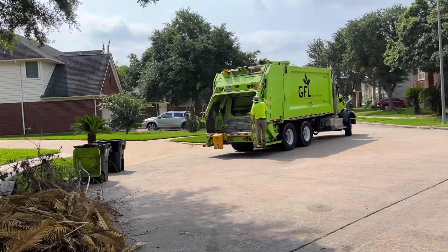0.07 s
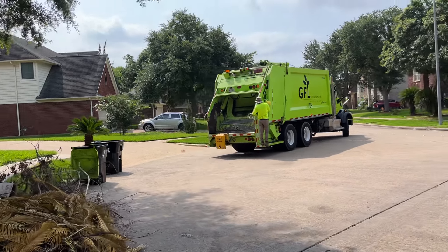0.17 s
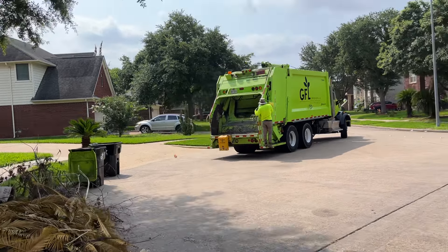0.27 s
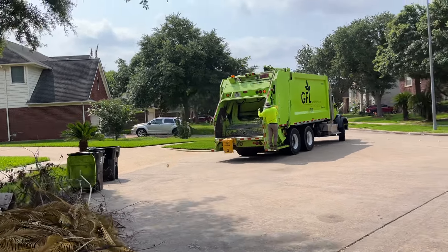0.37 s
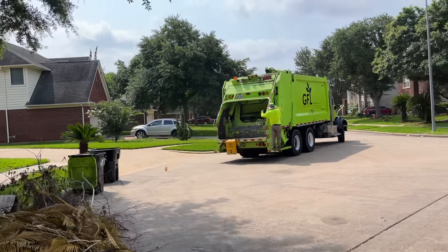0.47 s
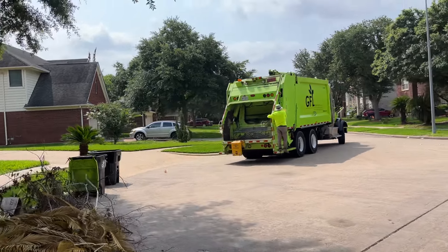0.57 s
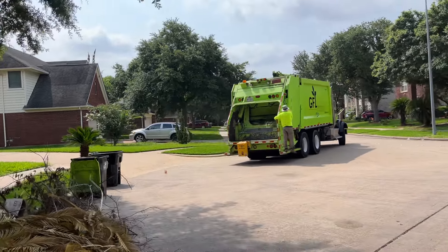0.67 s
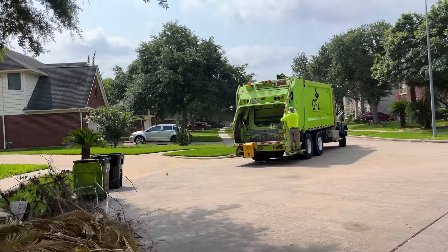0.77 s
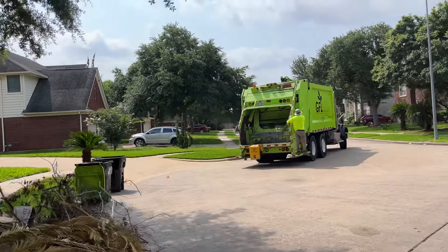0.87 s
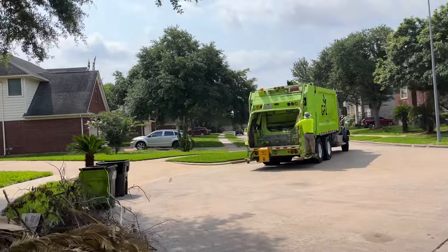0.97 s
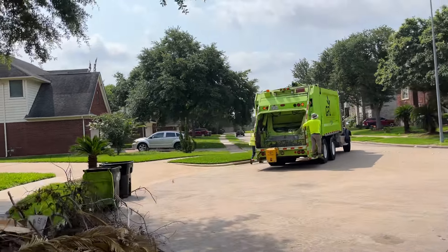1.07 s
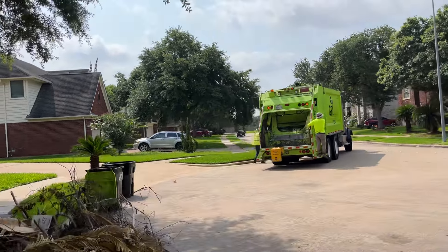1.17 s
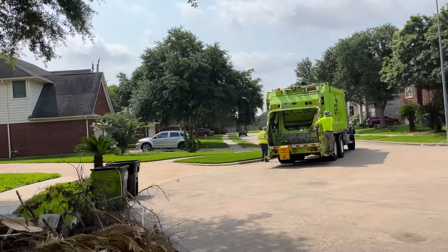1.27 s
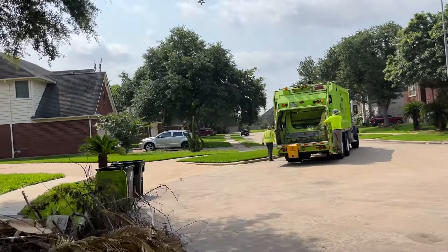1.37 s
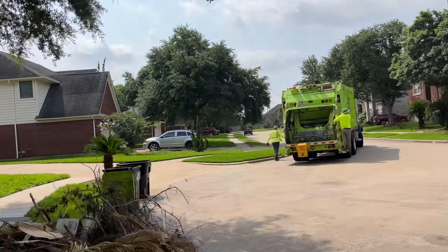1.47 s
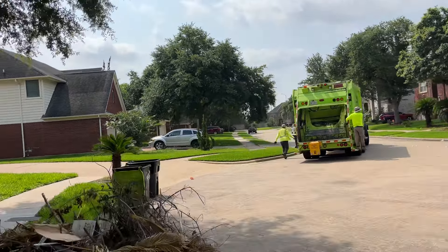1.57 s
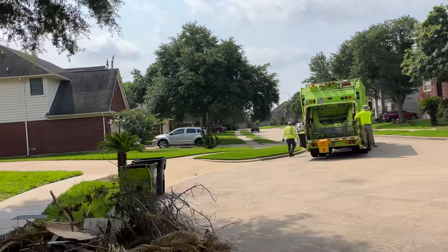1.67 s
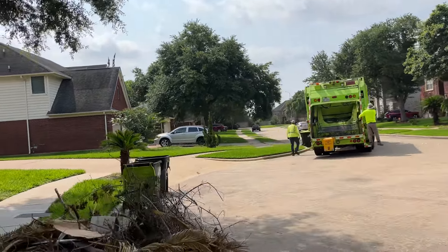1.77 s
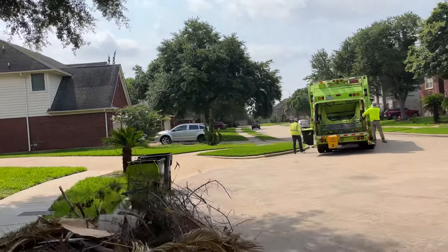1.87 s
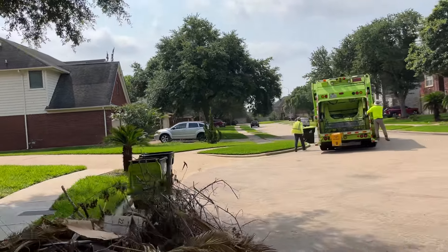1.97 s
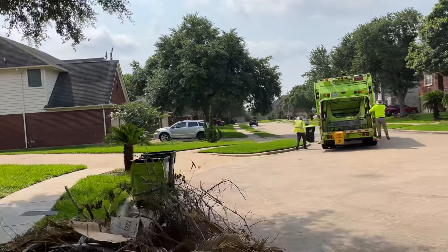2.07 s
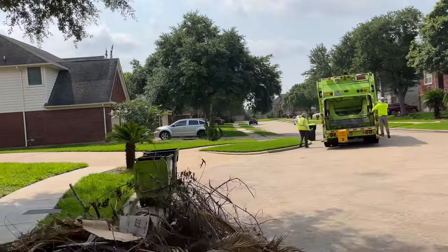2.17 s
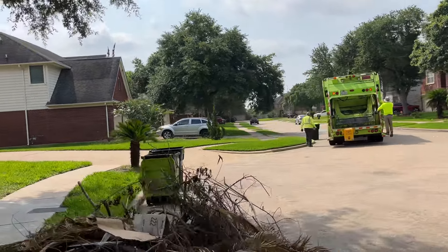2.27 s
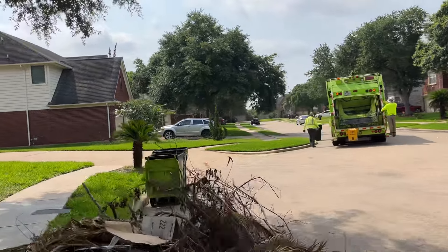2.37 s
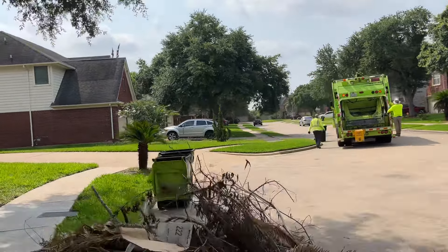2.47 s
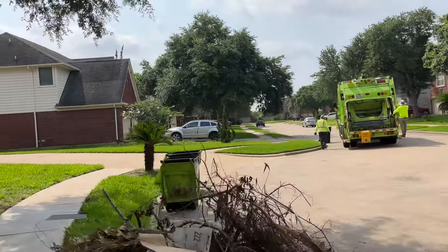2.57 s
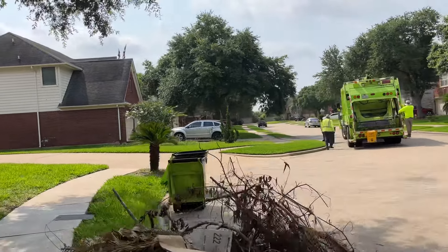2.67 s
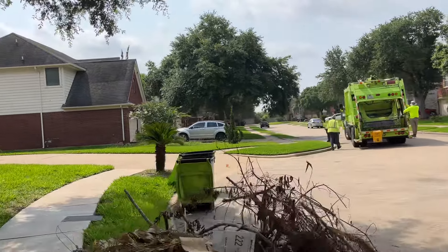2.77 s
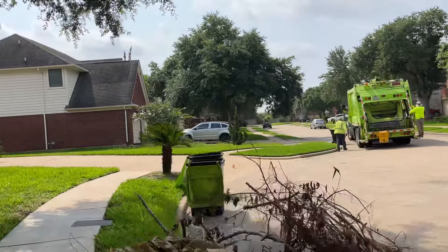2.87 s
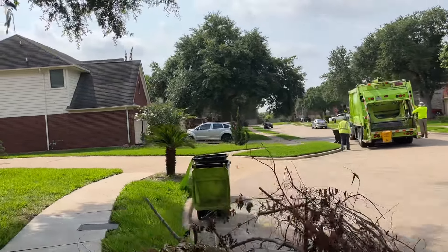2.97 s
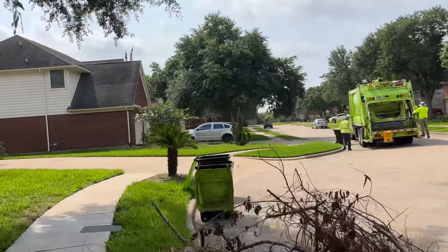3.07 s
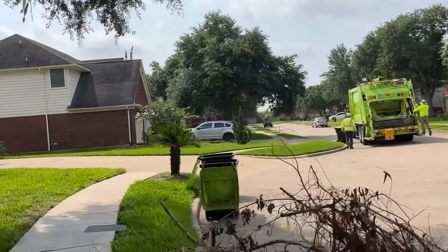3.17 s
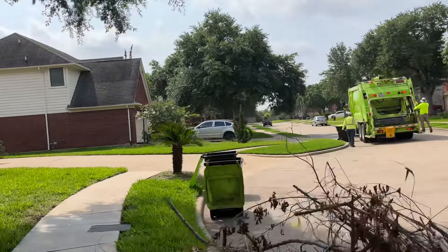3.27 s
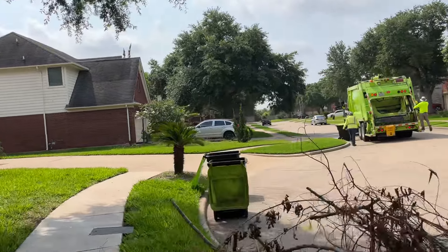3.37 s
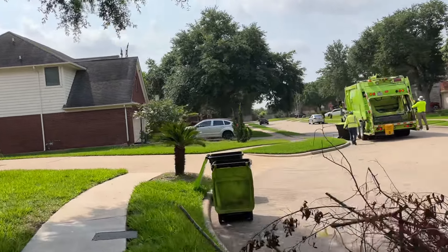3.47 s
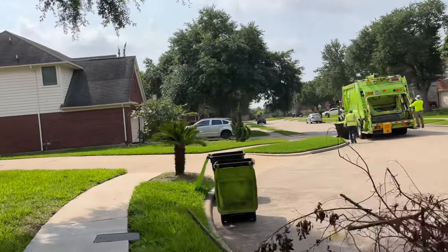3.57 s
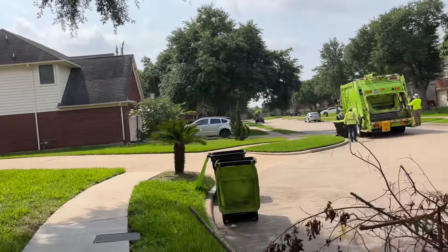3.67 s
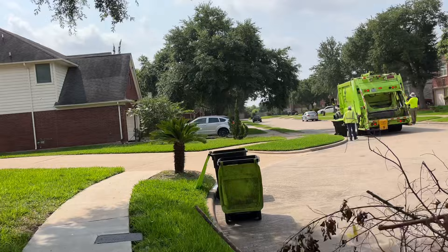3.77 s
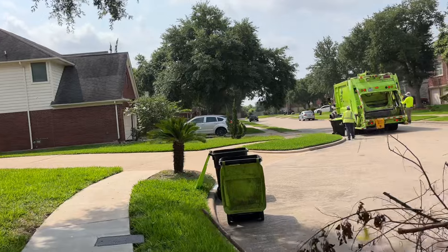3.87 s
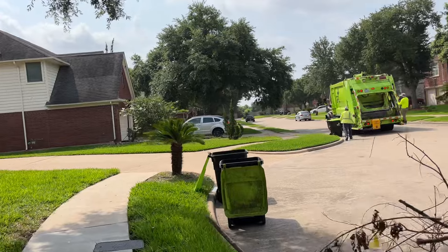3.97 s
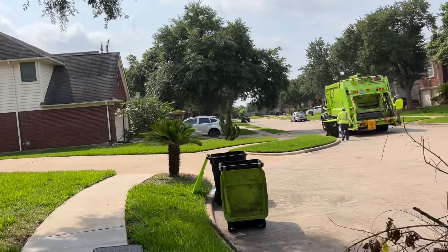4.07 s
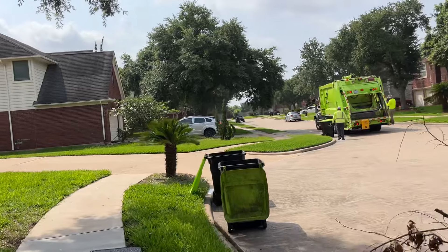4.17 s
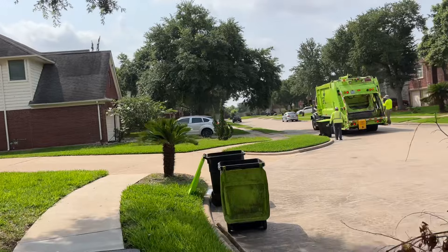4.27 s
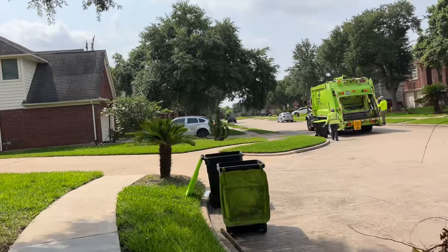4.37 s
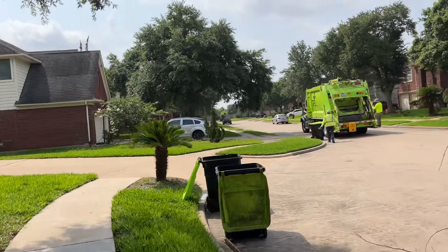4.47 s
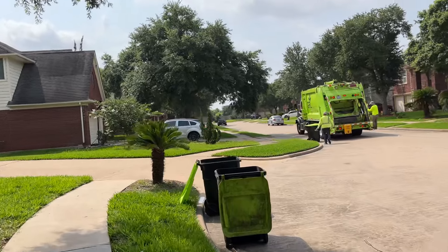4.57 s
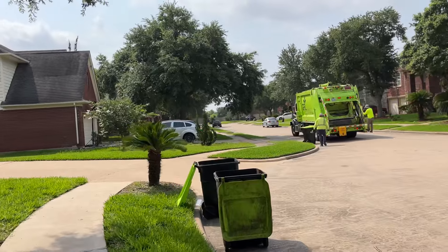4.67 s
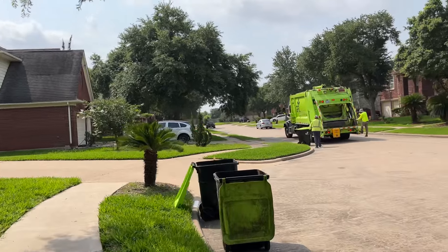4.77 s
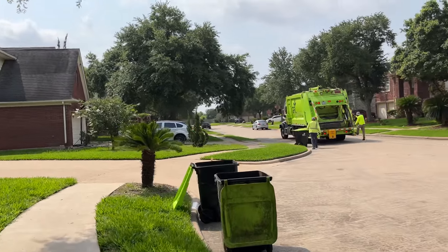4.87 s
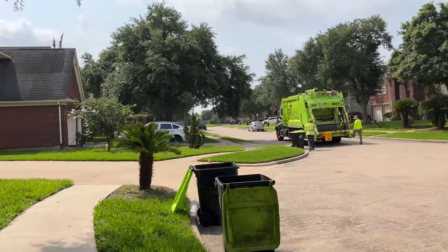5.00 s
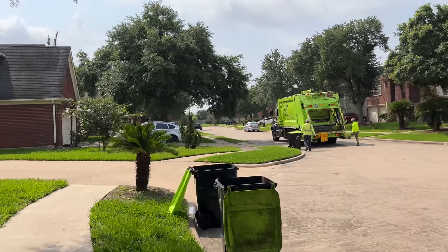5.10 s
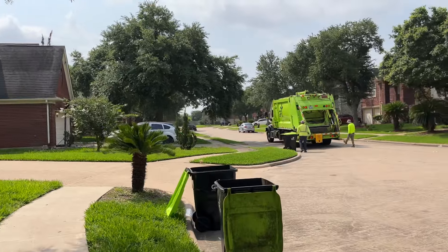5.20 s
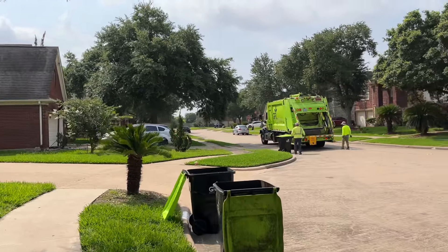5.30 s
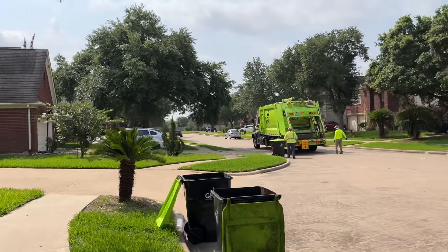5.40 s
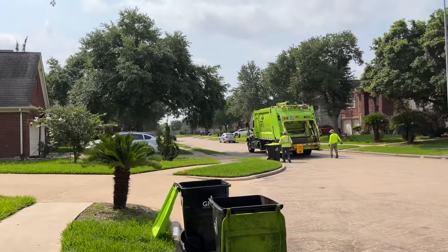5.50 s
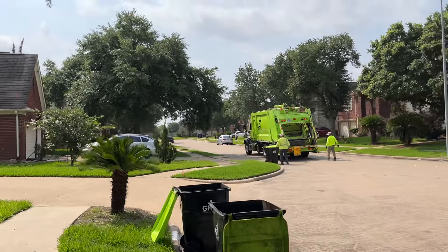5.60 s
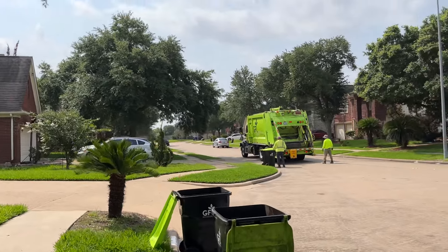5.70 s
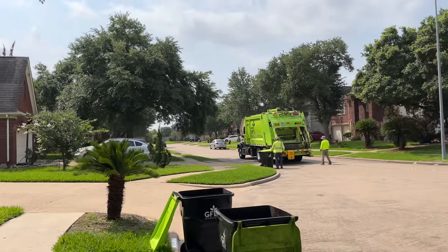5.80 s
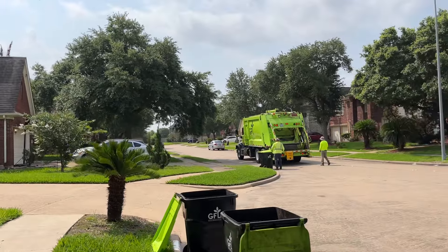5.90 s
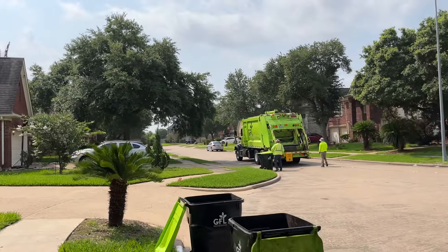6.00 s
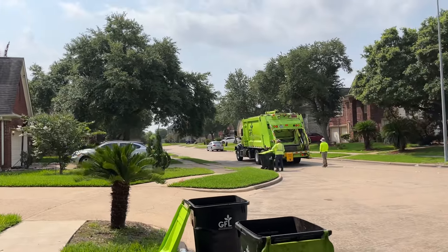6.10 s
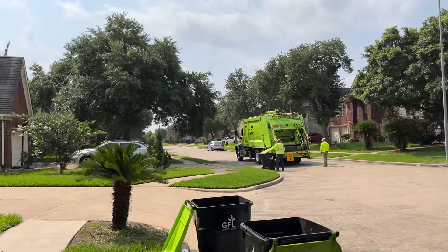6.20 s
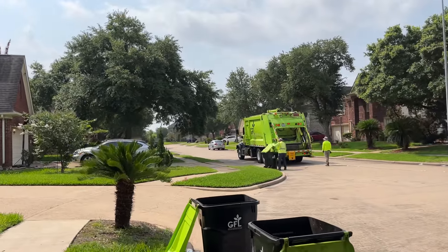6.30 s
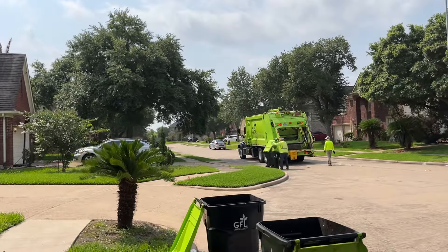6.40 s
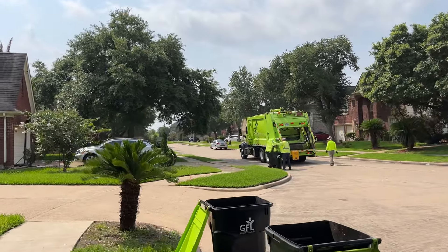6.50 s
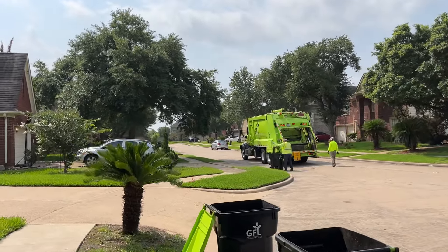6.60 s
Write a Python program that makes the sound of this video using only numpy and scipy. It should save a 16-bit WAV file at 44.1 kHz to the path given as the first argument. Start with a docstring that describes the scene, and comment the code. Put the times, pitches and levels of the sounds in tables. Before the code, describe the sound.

A diesel truck growls loudly nearby, climbing slightly in revs as it moves off, then droops into a distant low idle. Thin, trembling brake squeals sing high above it, a steel body jolts and a valve puffs air. Faint traffic washes behind. The handheld stereo microphone picks up scattered dull thumps, then a heavy flurry before the end; house fronts add short reverberation.

```python
"""A diesel garbage truck drives away along a suburban street, drops to idle and brakes with squeals.
The engine is firing pulses and throbbing noise, with gear, pump and turbocharger tones on top.
Squeals are trembling tones; the body clanks, small ticks sound and air puffs from a valve, all from noise
and fading tones. House fronts answer the engine knock and the squeals, over a wash of distant traffic.
Low thumps on the microphone, probably from handling or footsteps; its two ports differ in the treble."""
import sys
import numpy as np
from scipy import signal
from scipy.fft import rfft, irfft, next_fast_len
from scipy.io import wavfile
from scipy.ndimage import map_coordinates

SR = 44100
rng = np.random.default_rng(int(sys.argv[2]) if len(sys.argv) > 2 else 0)


def transcribe(u):
    """Save the signal u as a 16-bit wav file named by the first command-line argument.

    u: samples, shape (n,) or (channels, n), limited to [-1, 1]; the rate is SR.
    q: integer samples, one column per channel.
    """
    v = np.clip(np.atleast_2d(u).T, -1, 1)
    q = np.round(v * 32767).astype(np.int16)
    wavfile.write(sys.argv[1], SR, q)


N = 293000


def amp(db):
    """Turn decibels into a gain."""
    return 10 ** (np.asarray(db) / 20)


def unit(x):
    """Scale a signal to an average strength (rms) of 1."""
    return x / np.sqrt(np.mean(x ** 2) + 1e-20)


def along(points, hz):
    """Read a curve of (pitch, value) points, with pitch on a log axis."""
    point_hz, values = np.transpose(points)
    return np.interp(np.log(hz + 1), np.log(point_hz + 1), values)


def clock():
    """Give the time in seconds at every sample."""
    return np.arange(N) / SR


def curves(rows):
    """Draw one curve over time for each column after the time."""
    times, *columns = np.transpose(rows)
    return [np.interp(clock(), times, column) for column in columns]


def wobble(rate, size=N):
    """Draw a smooth random curve through `rate` random points a second."""
    knots = rng.standard_normal(int(size * rate / SR) + 4)
    return map_coordinates(knots, [np.arange(size) * rate / SR])


def filtered(x, response):
    """Multiply the spectrum of x by a response that depends on frequency."""
    size = next_fast_len(N + SR // 2)
    spectrum = rfft(x, size) * response(np.fft.rfftfreq(size, 1 / SR))
    return irfft(spectrum, size)[..., :N]


def coloured(x, spectrum):
    """Shape x with a spectrum, then scale it to rms 1."""
    return unit(filtered(x, lambda hz: amp(along(spectrum, hz))))


def spread(pair):
    """Mix two unrelated signals into left and right, nearly alike in the bass."""
    # how alike left and right are: (pitch [Hz], likeness [0 to 1])
    likeness = [(50, .93), (130, .92), (280, .85), (550, .76), (1000, .42), (1550, .25), (2400, .72),
                (6000, .65), (7800, .97), (9000, .97), (12000, .88)]

    def middle_and_side(hz):
        turn = np.arccos(np.clip(along(likeness, hz), -1, 1)) / 2
        return np.array([np.cos(turn), np.sin(turn)])

    mid, side = filtered(pair, middle_and_side)
    return np.array([mid + side, mid - side])


def rush(spectrum):
    """Make a stereo rush of noise with the given spectrum."""
    return spread(coloured(rng.standard_normal((2, N)), spectrum))


def burst(start, rise, t60):
    """Swell quickly, then die away by 60 dB every t60 seconds."""
    t = np.maximum(clock() - start, 0)
    return (1 - np.exp(-t / rise)) * amp(-60 * t / t60)


def band(cycles, width_hz):
    """Make two unrelated narrow noises around a moving pitch, given as its count of cycles."""
    carrier = np.exp(2j * np.pi * cycles)
    return np.array([np.real(carrier * (wobble(width_hz) + 1j * wobble(width_hz))) for _ in "LR"])


def houses(x):
    """House fronts and trees scatter a sound into a fading tail, different on each side."""
    t = np.arange(SR) / SR
    tail = rng.standard_normal((2, SR)) * amp(-60 * t / .8)  # dies away by 60 dB in 0.8 s
    tail /= np.linalg.norm(tail[0])
    return spread(signal.fftconvolve(x[None], tail, axes=1)[:, :N])


def heard_db(level, load):
    """An engine part gets quieter with distance, at lower load and as the truck's body turns in front."""
    # the truck drives off: (time [s], distance [m])
    distance = [(0, 12.23), (2.7, 18.2), (4.5, 30.2), (6.64, 43)]
    turn_start_s, turn_length_s = 0.32, 1.76  # the truck swings its tail to the listener
    full_db, idle_loss_db, hidden_db = level
    metres, = curves(distance)
    turned = np.clip((clock() - turn_start_s) / turn_length_s, 0, 1)
    return full_db - idle_loss_db * (1 - load) - hidden_db * turned - 20 * np.log10(metres / metres[0])


def engine():
    """Six cylinders fire pulses into the pipe; roar and clatter throb slightly, and the block knocks."""
    # how fast the cylinders fire: (time [s], firing rate [Hz])
    speed = [(0, 70), (.6, 72.5), (1.5, 74), (2, 75.8), (2.65, 77.6), (3, 65), (3.3, 53.5), (3.6, 44.5),
             (3.9, 38), (6.64, 37.5)]
    # exhaust tone at full speed: (pitch [Hz], level [dB])
    pipe_spectrum = [(20, -59), (38, -8), (58, 2), (80, -3), (130, 3.5), (190, 3.5), (270, -1), (380, -23),
                     (600, -68), (1500, -69)]
    # exhaust tone at idle: (pitch [Hz], level [dB])
    idle_spectrum = [(20, -28), (40, -24), (70, 0), (105, 0), (150, -6.5), (220, -11), (350, -13),
                     (600, -31), (1500, -51.5)]
    # rushing gas: (pitch [Hz], level [dB])
    roar_spectrum = [(120, -35), (300, 2), (420, -2.5), (640, -6.5), (730, -11.5), (950, -9.5),
                     (1150, -20.5), (1600, -23.5), (3000, -60)]
    # injector clatter: (pitch [Hz], level [dB])
    clatter_spectrum = [(500, -13.5), (1100, 7.5), (1500, 2), (1950, -1), (2550, 0.5), (3300, -5),
                        (5000, -11.5), (7000, -17.5), (9500, -19), (12500, -29), (15000, -32)]
    # combustion knock: (pitch [Hz], level [dB])
    knock_spectrum = [(180, -6.5), (290, 3), (480, -2.5), (1200, -9.5), (1700, -21), (2600, -18.5),
                      (4500, -47.5)]
    # exhaust: (level at full speed and first distance [dB], loss at idle [dB], loss in the turn [dB])
    exhaust_level = (-17.5, 12.05, 0.65)
    # roar: (level at full speed and first distance [dB], loss at idle [dB], loss in the turn [dB])
    roar_level = (-18, 11.4, 9.7)
    # clatter: (level at full speed and first distance [dB], loss at idle [dB], loss in the turn [dB])
    clatter_level = (-31.5, 10.1, 4.1)
    cylinder_db, scatter_db = 3.0, 2.2  # unevenness between cylinders, and from firing to firing
    knock_scatter_s = .0007  # uneven timing turns the knocks' hum into a growl

    rate, = curves(speed)
    load = ((rate - rate.min()) / np.ptp(rate)) ** 2.0  # load grows faster than speed
    exhaust_db = heard_db(exhaust_level, load)
    roar_db = heard_db(roar_level, load)
    clatter_db = heard_db(clatter_level, load)

    firings = np.cumsum(rate * (1 + 0.00366 * wobble(9))) / SR  # running count
    firing_samples = np.flatnonzero(np.diff(np.floor(firings)))
    count = len(firing_samples)
    cylinders = np.resize(rng.standard_normal(size=6), count)
    pulses = np.zeros(N)
    pulses[firing_samples] = amp(cylinder_db * cylinders + scatter_db * rng.standard_normal(count))
    throb = unit(1 + 0.035 * np.cos(2 * np.pi * firings))

    def pipe(spectrum):
        return unit(amp(-10.0) * coloured(pulses, spectrum) + throb * rush(spectrum))

    # as the engine slows the exhaust grows duller and a hum at twice the firing rate comes in
    exhaust = np.sqrt(load) * pipe(pipe_spectrum) + np.sqrt(1 - load) * pipe(idle_spectrum)
    hum = amp(-42 + 1.6 * wobble(15)) * (1 - load) * np.sin(2 * np.pi * 2 * firings)
    exhaust = amp(exhaust_db + 1.9 * wobble(14)) * exhaust
    roar = amp(roar_db + 0.39 * wobble(12)) * throb * rush(roar_spectrum)
    clatter = amp(clatter_db + 0.79 * wobble(9.8)) * throb * rush(clatter_spectrum)

    # each combustion knocks on the block a little early or late; echoes thicken the growl
    uneven = firing_samples + knock_scatter_s * SR * rng.standard_normal(count)
    uneven = np.clip(uneven, 0, N - 1).astype(int)
    block = coloured(np.bincount(uneven, np.sqrt(pulses[firing_samples]), N), knock_spectrum)
    knocks = amp(roar_db - 4.5) * unit(.5 * block + unit(houses(block)))
    return exhaust + roar + hum + clatter + knocks + drone(firings) + whine(firings)


def whine(firings):
    """Gears and a pump sing on multiples of the firing rate, fading in and out."""
    # base level of the gear tones: (time [s], level [dB])
    whine_level = [(0, -41.5), (1.1, -38.5), (1.8, -52), (2.6, -47.5), (3.3, -60)]
    # gear tones: (multiple of the firing rate, level added to the base [dB])
    gear_tones = [(4, 9), (9, 2.5)]
    # surges of a thin pump whistle: (time [s], level [dB], length from peak to about a third [s])
    whistle_surges = [(.32, -38.5, .11), (.97, -41, .13), (1.77, -36.5, .033), (1.89, -41, .022),
                      (2.1, -48.5, .3), (2.5, -46.5, .2)]
    # surges of the timing gears' mesh tone: (time [s], level [dB], length from peak to about a third [s])
    mesh_surges = [(1.1, -39, .4), (2.3, -39.5, .35)]
    level_db, = curves(whine_level)

    def tone(multiple):
        return np.sin(2 * np.pi * multiple * firings + .9 * wobble(40))

    def surges(rows):
        return sum(amp(db) * np.exp(-((clock() - s) / length) ** 2) for s, db, length in rows)

    gears = sum(amp(level_db + db + 2 * wobble(11.0)) * tone(multiple) for multiple, db in gear_tones)
    stutter = unit(amp(3.5 * wobble(30.18)))
    pump = surges(whistle_surges) * tone(33.55)
    mesh = surges(mesh_surges) * tone(16)
    return gears + stutter * (pump + mesh)


def turbo():
    """The turbocharger's high hiss, a band of noise, sinks and fades after the throttle closes."""
    # (time [s], middle pitch [Hz], level [dB])
    hiss = [(0, 11800, -67), (2.9, 12000, -65.5), (3.6, 10500, -67), (3.9, 9200, -81)]
    hz, db = curves(hiss)
    noise = unit(spread(band(np.cumsum(hz) / SR, width_hz=2200)))
    return amp(db + 0.87 * wobble(11)) * noise


def street():
    """Distant traffic is a wash of noise whose level drifts gently."""
    # (pitch [Hz], level [dB])
    street_spectrum = [(25, -2), (60, 18), (200, -7), (450, -9), (700, 0), (1020, 3.5), (1600, -7),
                       (2600, -14.5), (4500, -24), (8000, -30.5), (11000, -49), (15000, -58)]
    return amp(-37.0 + wobble(3.003)) * rush(street_spectrum)


def thumps():
    """Each thump is a swing or two of pressure, then a rumble, higher in sharp ones; a flurry fills gaps."""
    # low thumps, probably handling or footsteps: (time [s], level [dB], brightness [Hz])
    strong_thumps = [(.825, -20, 140), (1.079, -21, 110), (1.834, -18, 280), (1.895, -19, 150),
                     (2.35, -16, 230), (3.969, -26, 153), (4.911, -24, 130), (5.022, -27, 120),
                     (5.092, -33, 560), (5.144, -27.5, 139), (5.208, -25.5, 138), (5.536, -25, 192),
                     (5.688, -22, 258), (5.769, -11, 515), (5.789, -10.5, 236), (5.806, -16, 160),
                     (5.875, -14, 270), (5.956, -15, 177), (6.018, -9, 283), (6.061, -10.5, 460),
                     (6.076, -14.5, 168), (6.211, -30, 400), (6.291, -28, 300), (6.347, -18, 370),
                     (6.359, -19.5, 250), (6.418, -29, 300), (6.603, -23.5, 450), (6.619, -24.5, 280)]
    # the lumpy flurry between the thumps: (time [s], level [dB])
    flurry_level = [(4.8, -47), (5.6, -37), (5.75, -26), (5.85, -19.5), (5.93, -27), (6.08, -24),
                    (6.17, -41), (6.64, -43)]
    swings, lead_s = 1.38, 0.0025  # width of the push in half swings; build-up time of the rumble
    rumble_cycles = 6.7  # the rumble fades over this many periods of the brightness: sharp thumps are short
    order = 4

    def dull(hz, size):
        lowpass = signal.butter(order, hz, fs=SR, output="sos")
        return signal.sosfilt(lowpass, rng.standard_normal((2, size)))

    out = np.zeros((2, N + SR))
    t = np.arange(-SR // 8, SR // 4) / SR
    flurry_db, = curves(flurry_level)
    flurry = amp(flurry_db) * (clock() > flurry_level[0][0]) * unit(dull(230, N))
    for s, db, bright_hz in strong_thumps:
        push = 2 * np.sin(np.pi * bright_hz * t) * np.exp(-(bright_hz * t / swings) ** 2)
        life = np.exp(np.minimum(t / lead_s, -t * bright_hz / rumble_cycles))
        rumble = unit(life * dull(bright_hz, len(t))) * np.sqrt(np.mean(life ** 2))
        # the push reaches both sides alike, the rumble does not
        thump = amp(-1.65) * push * [[1], [0]] + amp(-2.5) * rumble
        first = int((s + t[0]) * SR)
        out[:, first:first + len(t)] += amp(db) * thump
    # the microphone passes little below its bass roll-off
    rolloff = signal.butter(order, 45, "highpass", fs=SR, output="sos")
    return signal.sosfilt(rolloff, spread(out[:, :N] + flurry))


def drone(firings):
    """Rough bands of the exhaust slide down with the engine as the throttle closes."""
    # (time [s], level [dB])
    boom_level = [(1.7, -58), (2.35, -38), (2.9, -29), (3.6, -30), (4.2, -48.5)]
    # (multiple of the firing rate, level [dB])
    drone_bands = [(2.9, -1.5), (4.0, -1)]
    level_db, = curves(boom_level)
    bands = sum(amp(db) * band(multiple * firings, width_hz=60) for multiple, db in drone_bands)
    return amp(level_db) * unit(spread(bands))


def brakes():
    """Brake shoes make the drum sing: gliding tones that tremble finely as the shoes stick and slip."""
    # (start [s], length [s], pitch halfway [Hz], glide [Hz per s], level [dB])
    squeals = [(3.53, .95, 8030, 330, -36.5), (3.72, .5, 8290, 20, -39.5), (3.85, .65, 6358, -15, -39.5),
               (3.85, .35, 7035, 0, -38), (4.22, .3, 7015, 0, -42.5), (4.035, .45, 5072, 0, -43.5),
               (4.35, .27, 7370, -1100, -39), (4.26, .43, 9020, -100, -46), (4.48, .16, 8730, -300, -43),
               (4.76, .77, 7655, -47, -46), (5.45, .42, 8370, 0, -53), (5.47, .34, 8060, 350, -52.5),
               (5.67, .13, 7130, -200, -52), (5.92, .18, 7480, 800, -35), (5.93, .28, 8870, -500, -49),
               (6.055, .11, 7285, 75, -34.5), (6.05, .66, 7570, 150, -47), (6.01, .2, 8410, 0, -47),
               (6.21, .5, 8420, 400, -45)]
    # strength of the tone an octave above: (squeal pitch [Hz], level [dB])
    octave = [(5000, -11.5), (7000, -13), (7400, -36)]
    swell_s, release_s = .085, .075  # how a squeal builds up and lets go
    flutter, wander = .0055, .0013  # fast and slow pitch trembling, as shares of the pitch
    chatter, chatter_per_s = .22, 130  # depth and speed of stick and slip
    out = np.zeros(N + SR)
    t = np.arange(SR) / SR
    size = len(t)

    def shake():
        return chatter * wobble(chatter_per_s, size)

    for start, length, hz, glide, db in squeals:
        tremble = 1 + flutter * wobble(480, size) + wander * wobble(12.04, size)
        pitch = (hz + glide * (t - length / 2)) * tremble
        phase = 2 * np.pi * np.cumsum(pitch) / SR
        ring = np.sin(phase) + amp(along(octave, hz)) * np.sin(2 * phase)
        tone = (1 + shake()) * ring + shake() * np.cos(phase)
        swell = np.clip(np.minimum(t / swell_s, (length - t) / release_s), 0, 1)
        grip = unit(amp(2.9 * wobble(55, size)))
        first = int(start * SR)
        out[first:first + size] += amp(db) * swell * grip * tone
    return out[:N]


def ticks():
    """Short dry ticks are each a puff of noise around one pitch."""
    # (time [s], level [dB], pitch [Hz])
    tick_rows = [(3.615, -46, 6200), (5.921, -44.5, 3400)]
    sharpness = 4  # higher makes a narrower band

    def ring(centre):
        noise = rng.standard_normal((2, N))
        return unit(filtered(noise, lambda hz: 1 / (1 + (2 * sharpness * (hz / centre - 1)) ** 2)))

    return spread(sum(amp(db) * burst(s, 0.00082, t60=0.1) * ring(centre) for s, db, centre in tick_rows))


def clanks():
    """The loaded steel body jolts: panels thud as fading tones under a short rattle of noise."""
    # (time [s], level [dB], time to fade by 60 dB [s], rattle brightness [Hz])
    jolts = [(4.378, -22.5, .28, 9000), (5.521, -25.5, .12, 2600)]
    # rattle: (pitch [Hz], level [dB])
    body_spectrum = [(40, -13), (110, 3.5), (330, 3.5), (520, -6), (750, -8), (1500, -14.5), (2300, -16),
                     (3700, -20.5), (4800, -34), (12000, -41)]
    # ringing of the panels: (pitch [Hz], level [dB], time to fade by 60 dB [s])
    panels = [(110.4, -3.5, 0.2), (255, 2.5, 0.022), (507, -6.5, 0.085)]

    def rattle(s, t60, top_hz):
        noise = burst(s, 0.0014, t60) * rush(body_spectrum)
        return filtered(noise, lambda hz: 1 / (1 + 1j * hz / top_hz))

    def thud(s):
        t = clock() - s
        return sum(amp(db) * burst(s, 0.00078, t60) * np.sin(2 * np.pi * hz * t) for hz, db, t60 in panels)

    return sum(amp(db) * (rattle(s, t60, top_hz) + thud(s)) for s, db, t60, top_hz in jolts)


def valve():
    """A brake valve lets out air: a soft, sputtering hiss swells and dies away."""
    # (time [s], level [dB], time to fade by 60 dB [s])
    puffs = [(4.38, -30.5, 0.73)]
    # (pitch [Hz], level [dB])
    air_spectrum = [(2000, 2), (4500, 1.5), (7000, -6), (9500, 5), (11200, 1.5), (13000, -4), (15000, -23)]
    sputter = amp(2.2 * wobble(30))
    envelope = sum(amp(db) * burst(s, 0.15, t60) for s, db, t60 in puffs)
    return sputter * envelope * rush(air_spectrum)


def scene():
    """Add up the truck, the echoes of its squeals, the ticks, the thumps and the distant traffic."""
    squeal = brakes()
    squeal = squeal + amp(-4) * houses(squeal)
    truck = engine() + turbo() + clanks() + valve() + squeal
    return truck + ticks() + thumps() + street()


def record(dry):
    """The two ports differ in phase in the treble and in level in the middle; the top is cut off."""
    # (pitch [Hz], how far left leads right [radians])
    port_phase = [(4000, 0), (6300, -1), (7100, -2), (7580, -2.3), (7900, -2.85), (9100, -3.05),
                  (10000, -5), (13200, -6.6), (14300, -9.2)]
    # (pitch [Hz], left minus right level [dB])
    port_lean = [(280, 0), (550, -1.8), (1200, -2), (2500, .8), (5500, 1.5), (8500, 0)]
    top_hz = 15200

    def both_ports(hz):
        lean = amp(along(port_lean, hz) / 2)
        return np.array([np.exp(1j * along(port_phase, hz)) * lean, 1 / lean])

    ports = filtered(dry, both_ports)
    return filtered(ports, lambda hz: hz < top_hz)


dry = scene()
out = record(dry)
transcribe(out)
```